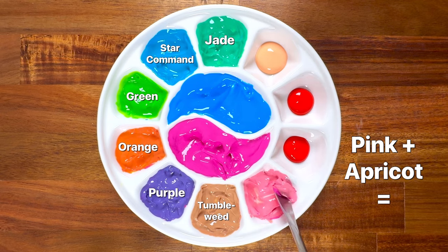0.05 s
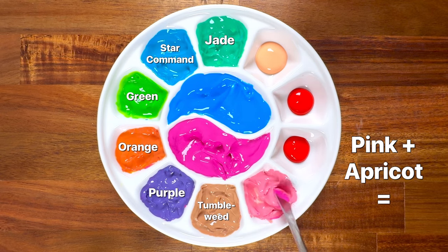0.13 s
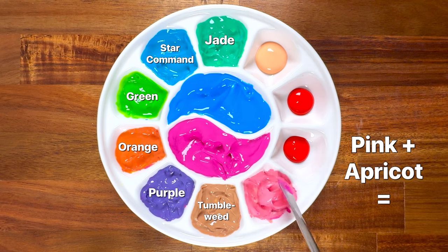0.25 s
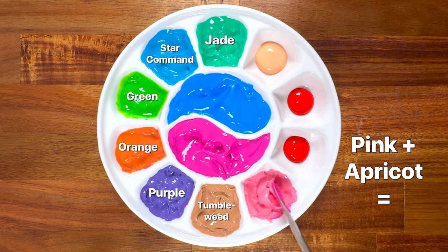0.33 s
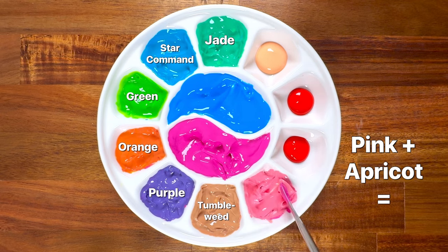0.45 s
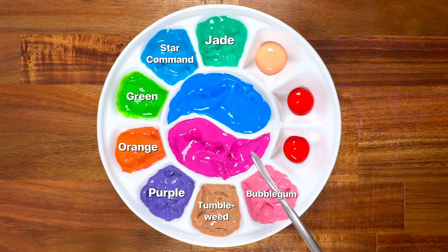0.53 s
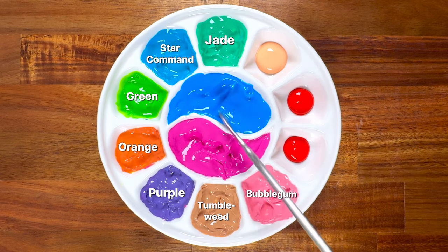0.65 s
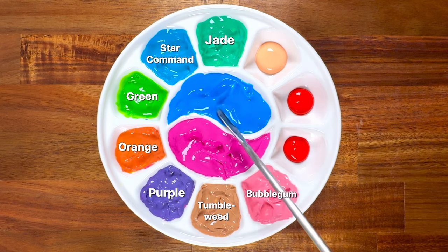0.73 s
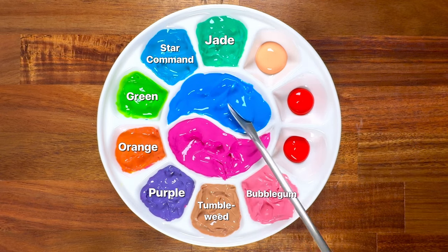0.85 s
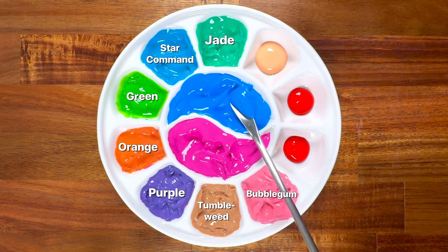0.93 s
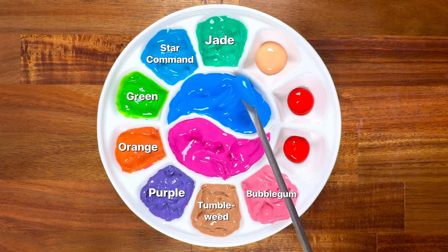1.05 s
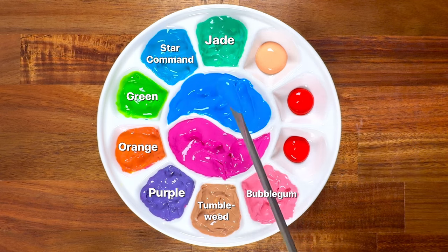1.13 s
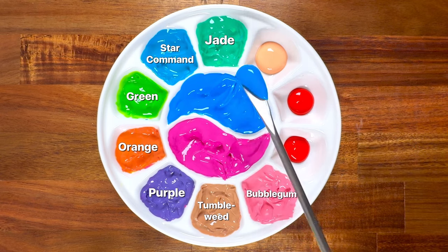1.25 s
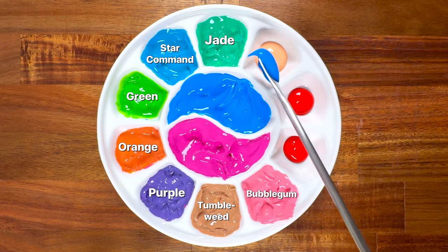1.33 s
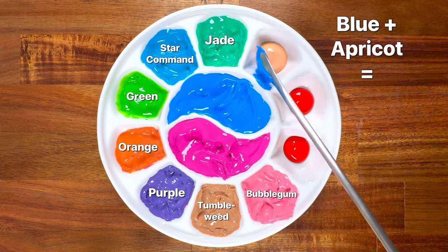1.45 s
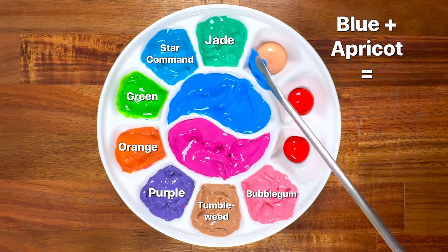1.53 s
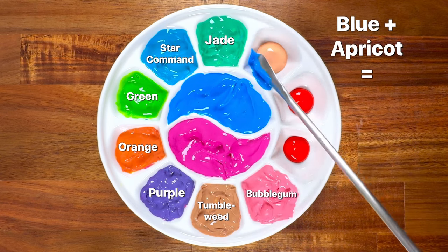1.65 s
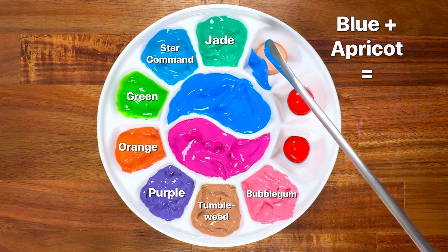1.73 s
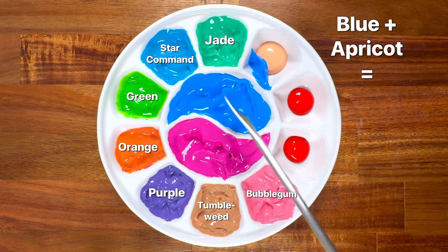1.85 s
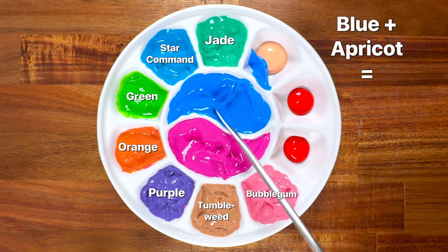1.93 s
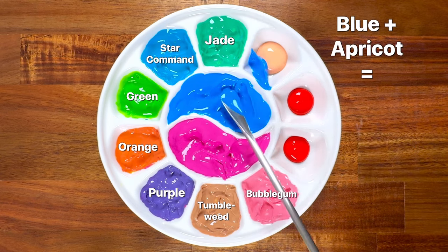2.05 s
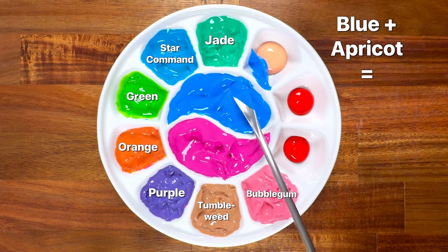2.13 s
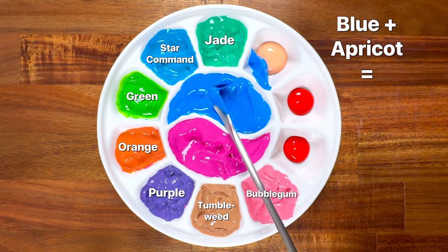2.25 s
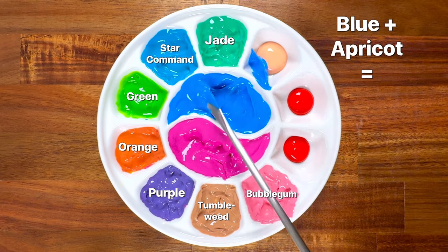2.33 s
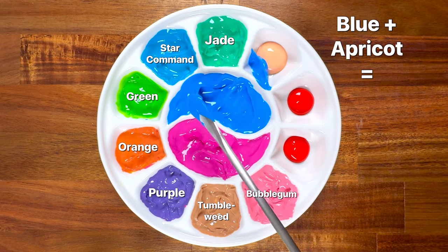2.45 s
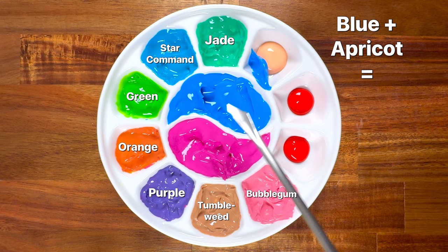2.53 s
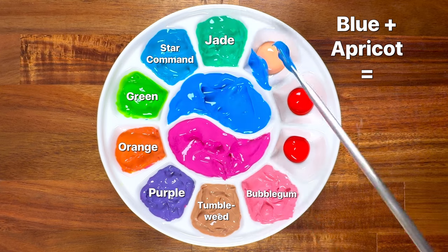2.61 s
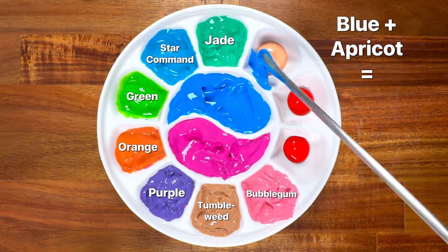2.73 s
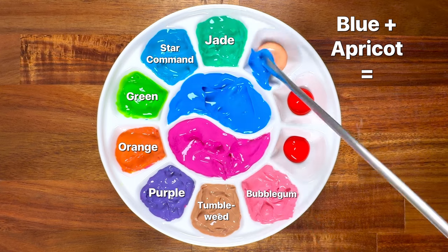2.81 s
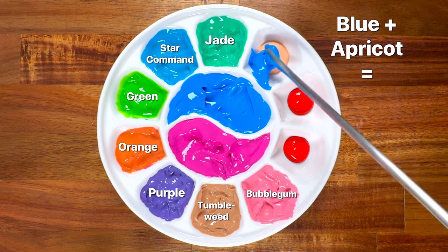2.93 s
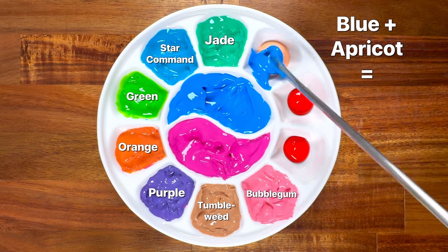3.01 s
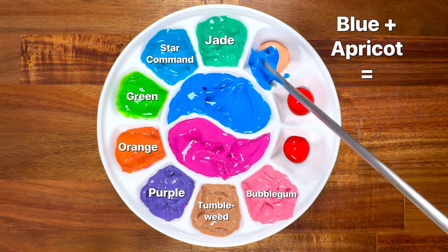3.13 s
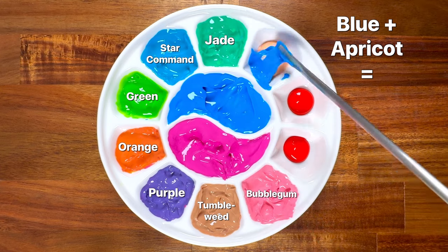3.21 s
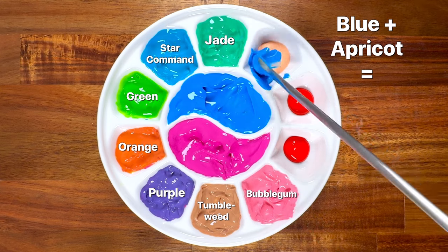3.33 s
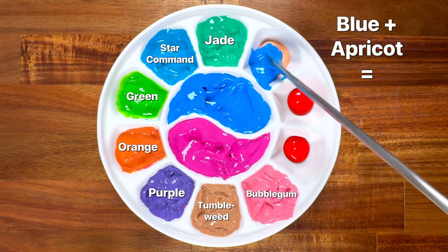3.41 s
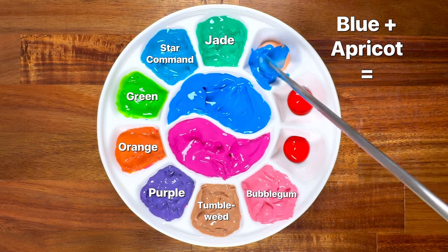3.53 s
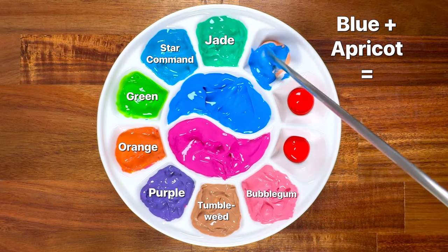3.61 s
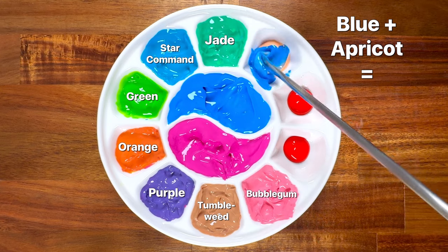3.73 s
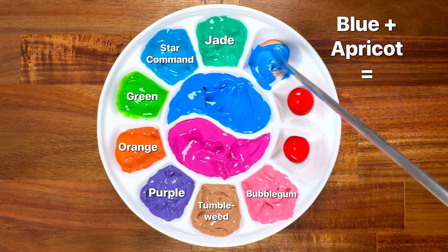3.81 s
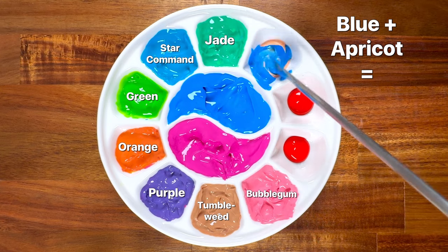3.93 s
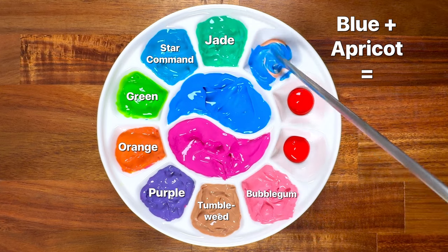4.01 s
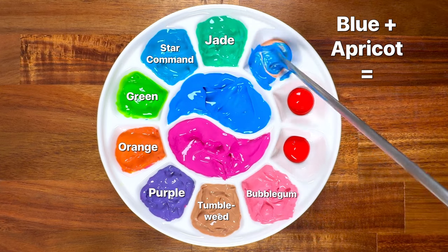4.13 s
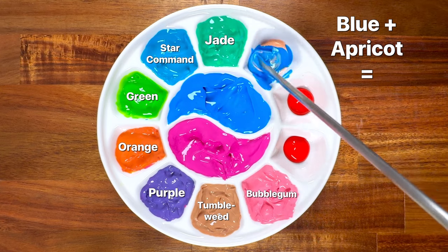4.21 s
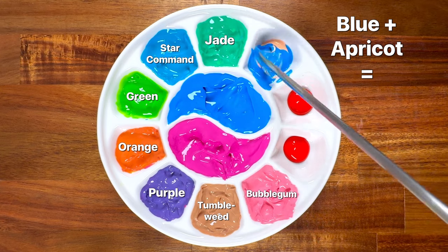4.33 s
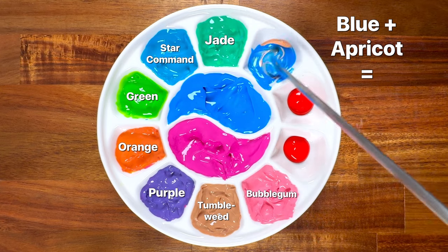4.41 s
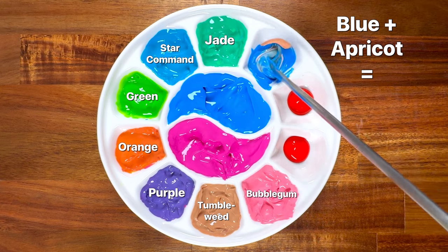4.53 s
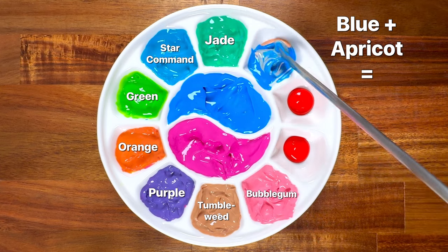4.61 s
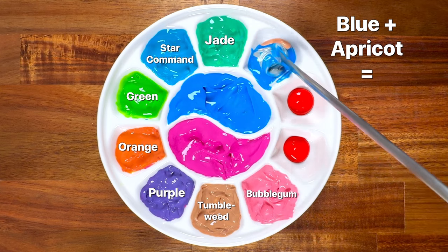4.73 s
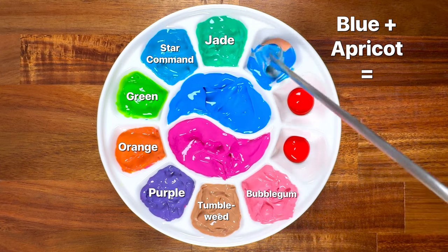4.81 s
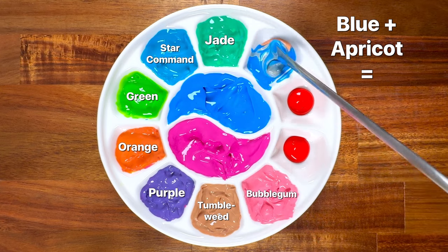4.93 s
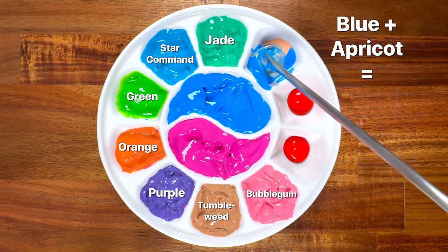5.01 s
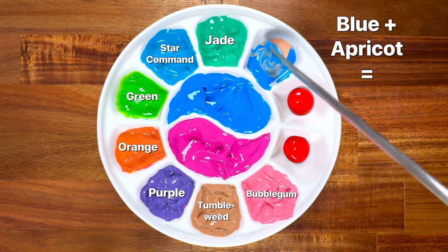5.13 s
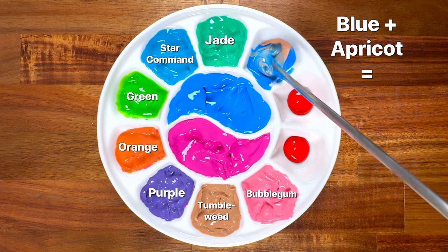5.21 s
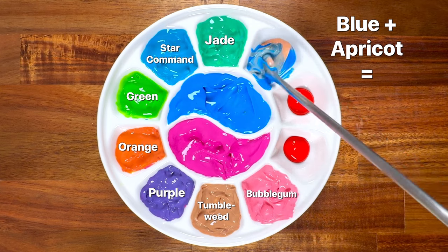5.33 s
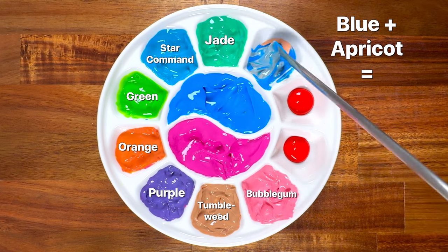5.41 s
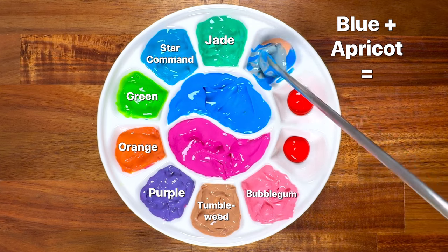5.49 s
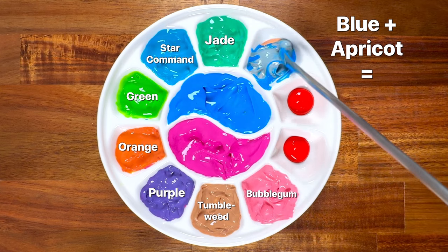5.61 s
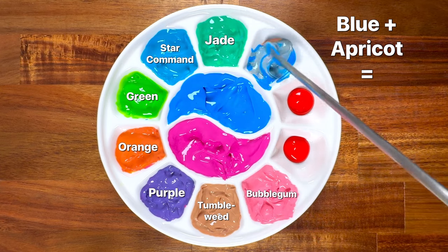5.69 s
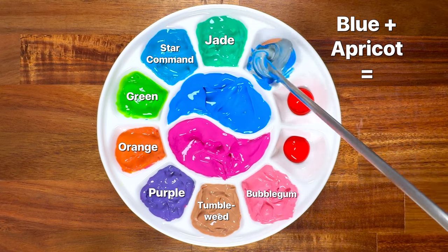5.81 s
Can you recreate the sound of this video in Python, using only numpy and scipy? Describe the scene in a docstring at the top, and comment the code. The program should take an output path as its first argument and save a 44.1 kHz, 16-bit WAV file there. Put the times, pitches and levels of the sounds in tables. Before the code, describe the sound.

A metal blade strikes plastic well walls, recorded close in stereo in a quiet room. A brief, tight cluster of sped-up clicks and a dull paint squelch give way to near silence with isolated light tinks and faint scrapes. Then strong cracking taps arrive, followed by fast irregular clattering with short bright rings and table thuds, ending in a few spaced hard knocks and a quick last flurry.

```python
"""Palette knife in thick paint

A steel knife stirs paint in the wells of a plastic palette on a wooden table, heard very close.
Taps on the well walls ring the blade, crack and rattle the plastic and thump the table (decaying modes
plus coloured noise); the blade also scrapes (grainy noise) and the paint squelches (dull noise bursts).
Time-lapse: each stretch has its own speed, which scales pitches up and decays down; room air lies below.
A fast limiter flattens the hardest taps."""
import sys
import numpy as np
from scipy import signal
from scipy.fft import rfft, irfft
from scipy.io import wavfile
from scipy.ndimage import uniform_filter1d, minimum_filter1d

SR = 44100
rng = np.random.default_rng(int(sys.argv[2]) if len(sys.argv) > 2 else 0)


def to_wav(sig):
    """Store sig (one row per channel, or 1-D mono) as 16-bit WAV at the path in sys.argv[1].

    Samples outside -1..1 are clipped; the rate is SR.
    """
    pcm = np.clip(np.atleast_2d(sig), -1, 1) * 32767
    pcm = np.round(pcm).astype(np.int16)
    wavfile.write(sys.argv[1], SR, pcm.T)  # frames by channels


N = 258426

# All mode and colour tables hold for speed 1; levels within one table are relative.
# time-lapse stretches: start t/s
STRETCH_STARTS_S = [0, .515, 3.1, 4.48, 5.68]
# time-lapse stretches: speed/factor
STRETCH_SPEEDS = [3.2, 1.385, 1.0, 1.097, 1.52]
# room air in each stretch: level/dB
ROOM_LEVELS_DB = [-52, -49.5, -50, -49.5, -50.5]
# knife taps: t/s, strength/dB, blade ping re strength/dB (high when the blade is free to ring)
TAPS = [(.0002, -17.5, -23), (0.2113, -29, -20), (.2715, -41.5, -20), (0.2886, -42, -20),
        (0.319, -32.5, -20), (.3304, -34, -20), (0.3428, -28.5, -20), (0.4043, -16, -20), (.4612, -11, -29),
        (0.5005, -24.5, -23), (0.509, -36.5, -19), (0.7022, -36, 20.5), (1.4212, -19.5, 1.5),
        (1.4355, -26, 10), (1.549, -23.5, 8), (1.9666, -14, 9), (2.2441, -32, 9.5), (2.835, -3, -25),
        (3.031, -12, -21), (3.1434, -20, -9), (3.267, -2, -4), (3.3933, -8, -14), (3.5301, -42, 6),
        (3.664, -38, 1.5), (3.6997, -22, 0), (3.746, -9.5, -30), (3.841, -22, -21), (3.9229, -13, -1),
        (3.9483, -18.5, -14), (3.967, -27.5, -3), (4.0106, -10, -5.5), (4.0591, -15, -9),
        (4.1193, -9.5, -16.5), (4.1643, -10, -5), (4.2013, -16, -13), (4.2591, -8, -5.5),
        (4.2982, -10.5, -9), (4.4044, -12, -3.5), (4.4169, -9, -12), (4.4431, -13.5, -7), (4.5099, -8, -1),
        (4.539, -15.5, -7), (4.5617, -23.5, -11), (4.5947, -14, -11), (4.6274, -11, -1),
        (4.6559, -19.5, -2), (4.7318, -8.5, -4), (4.7658, -15, -16), (4.7882, -18, -23), (4.834, -31, -17),
        (4.8524, -19, -2.5), (4.8736, -15.5, -12.5), (4.8976, -15.5, -26), (4.9535, -13, -3),
        (5.18, -3, -13), (5.3234, -27.5, -5), (5.461, -2.5, -1), (5.6177, -17.5, -3.5), (5.6319, -12, -8),
        (5.702, -16, -16), (5.7221, -24.5, -0.5), (5.8024, -13.5, -3), (5.8259, -24, -30)]
# blade dragging over plastic: t/s, nominal length/s, level/dB
SCRAPES = [(.793, 0.021, -35.5), (.837, .046, -46), (1.995, .038, -43), (2.055, 0.077, -53.5),
           (2.262, .063, -51.5), (3.79, 0.036, -42.5), (4.138, 0.024, -29), (5.642, .016, -28)]
# blade digging into paint: t/s, level/dB
SQUELCHES = [(.0965, -20), (.719, -18.5)]

# blade, first and third bending modes, which clack: f/Hz, level/dB, t60/s
CLACK_MODES = [(2338, -5.5, 0.021), (2510, -1, 0.016), (9450, -11.5, 0.022), (9570, -7.5, 0.015)]
# blade, second bending mode, which pings: f/Hz, level/dB, t60/s
PING_MODES = [(5760, -3, 0.022), (5460, -8, 0.0068)]
# struck wall, short modes: f/Hz, level/dB, t60/s
WALL_MODES = [(4590, -5.5, 0.02), (7210, -10, 0.017), (7840, -1, 0.01), (8325, -0.5, .018),
              (13296, 2, 0.013)]
# plastic palette, long modes: f/Hz, level/dB
PALETTE_MODES = [(1210, -5), (1380, -8), (2400, -6), (4590, -2), (4750, -4), (7610, -2), (7860, 0),
                 (8105, 1), (8270, 0), (8380, -2), (12970, -5)]
# palette rocking on the table, modes: f/Hz, level/dB, t60/s
TABLE_MODES = [(121.85, -1.5, 0.25), (152, -9, .08), (202.5, -2.5, 0.21), (228.2, -1.5, 0.11),
               (264, -0.5, 0.067), (290, -8, 0.077), (387, -6, 0.098), (440.5, 8, 0.055), (497, -4.5, 0.2),
               (595, -0.5, 0.076)]

# first crack of the plastic: f/Hz, density/dB per Hz
CRACK_COLOUR = [(50, -43), (300, -12.5), (900, -34.5), (1350, -4), (1900, -24.5), (2600, 0), (3700, -7.5),
                (4600, -7.5), (6400, -4.5), (8150, -0.5), (9000, -4.5), (12200, -11), (13100, -5),
                (16000, -16)]
# dense after-ring of the plastic: f/Hz, density/dB per Hz
RATTLE_COLOUR = [(50, -40.5), (300, 4), (850, -8.5), (1250, 0.5), (1900, -9), (2450, -2), (3600, -8.5),
                 (4650, -3.5), (6500, -7), (8050, 0.5), (9100, -6.5), (11800, -13), (13200, -7.5),
                 (16000, -19.5)]
# broad woody thud of the table top: f/Hz, density/dB per Hz
THUD_COLOUR = [(30, -44.5), (85, -25), (120, 3.5), (175, -7.5), (235, 3), (340, -9), (480, -4.5),
               (640, -13.5), (850, -21.5), (3000, -64.5)]
# rubbed blade: f/Hz, density/dB per Hz
RUB_COLOUR = [(100, -50), (1400, -37), (2450, -8.5), (3100, -20), (3700, -14.5), (4400, -28), (5100, 1.5),
              (5500, -10), (5850, 8), (6600, -35), (12000, -41)]
# paint: f/Hz, density/dB per Hz
PAINT_COLOUR = [(30, -66.5), (90, -17.5), (230, -7), (530, -3), (1000, -8), (1600, -12), (2400, -25.5),
                (6000, -41.5), (12000, -59)]
# room air: f/Hz, density/dB per Hz
ROOM_COLOUR = [(20, -46.5), (60, -22.5), (112, 2), (180, -7), (500, -11), (800, -25), (1400, -31.5),
               (2400, -31), (5000, -38), (9000, -38.5), (14000, -44.5)]

PALETTE_T60_S, LEAD_S = .1, .0034  # at speed 1
TOP_HZ = 16200
# dB per dB of strength in the heavier parts; the wall's crack follows strength fully
BODY_GROWTH = 0.68
# heavier parts at strength 0 dB, before the trims in strike(), after_ring() and thump()
CLACK_DB, AFTER_RING_DB, THUMP_DB = -8, -15.5, -16.5
# a tap right after another only glances off the wall; the loss decays with time constant SWING_S
GLANCE_CLACK_DB, GLANCE_THUMP_DB, SWING_S = -8, -9.5, 0.053


def blows():
    """Tap times and part levels, from strength and the time to swing since the previous tap."""
    previous_s = -np.inf
    for s, strength_db, ping_db in TAPS:
        glance = np.exp(-(s - previous_s) / SWING_S)
        body_db = BODY_GROWTH * strength_db
        clack_db = CLACK_DB + body_db + glance * GLANCE_CLACK_DB
        thump_db = THUMP_DB + body_db + glance * GLANCE_THUMP_DB
        yield s, clack_db, strength_db + ping_db, strength_db, AFTER_RING_DB + body_db, thump_db
        previous_s = s


def tap(speed, clack_db, ping_db, crack_db, ring_db, thump_db):
    """Steel meets plastic: blade and wall sound at once, palette and table build up later."""
    lead = int(LEAD_S / speed * SR)
    contact = strike(speed, clack_db, ping_db, crack_db)
    hit = contact + after_ring(speed, ring_db) + thump(speed, thump_db)
    # a quiet copy of the contact sound, starting a few ms early
    early_copy = undb(-24.5) * np.pad(contact, ((0, 0), (0, lead)))
    return np.pad(hit, ((0, 0), (lead, 0))) + early_copy


def strike(speed, clack_db, ping_db, crack_db):
    """Contact: the blade's bending modes clack and ping, the wall rings briefly and cracks."""
    t = np.arange(SR // 4) / SR
    age = t * speed
    bite = 1 - fade(age, .001)
    clack = ring(CLACK_MODES, t, speed, detune=.01, spread=0.092) * bite
    ping = ring(PING_MODES, t, speed, detune=0.003, spread=0.18) * (1 - fade(age, 0.0025))
    wall = ring(WALL_MODES, t, speed, detune=0.0078, spread=0.33) * bite
    snap = noise(CRACK_COLOUR, speed, len(t), spread=0.43) * fade(age, 0.02) * bite
    blade = burst(clack, clack_db - .5) + burst(ping, ping_db)
    return blade + burst(wall, crack_db - 2.5) + burst(snap, crack_db - 2)


def after_ring(speed, db):
    """The blow spreads through the plastic, so its ring builds up; its rattle flutters randomly in level."""
    t = np.arange(SR // 4) / SR
    age = t * speed
    spreading = 1 - fade(age, 0.048)
    flutter = uneven(len(t), db=2)
    palette = [(hz, level_db, PALETTE_T60_S) for hz, level_db in PALETTE_MODES]
    modes = ring(palette, t, speed, detune=.003, spread=0.23) * spreading
    rattle = noise(RATTLE_COLOUR, speed, len(t), spread=0.94) * fade(age, .12)
    rattle = rattle * spreading * flutter
    return burst(modes, db - 6) + burst(rattle, db - 0.5)


def thump(speed, db):
    """The heavy table gets moving gradually: rocking modes and a woody thud."""
    t = np.arange(SR // 4) / SR
    age = t * speed
    swell = 1 - fade(age, 0.026)
    rocking = ring(TABLE_MODES, t, speed, detune=.035, spread=0.065) * swell
    thud = noise(THUD_COLOUR, speed, len(t), spread=0.3) * fade(age, 0.19) * swell
    return burst(rocking, db - 1) + burst(thud, db - 2.5)


def scrape(speed, length_s, db):
    """The edge sticks and slips: hiss in uneven grains, dying away as the stroke slows."""
    size = int(1.5 * length_s * SR)
    progress = np.arange(size) / SR / length_s
    pressure = np.interp(progress, [0, .12, .85, 1.5], [0, 1, .7, 0])
    return undb(db) * pressure * uneven(size, db=5.0) * noise(RUB_COLOUR, speed, size, spread=0.28)


def squelch(speed, db):
    """Thick paint gives way with a dull, quickly fading smack."""
    t = np.arange(SR // 4) / SR
    envelope = fade(t * speed, 0.14) * (1 - fade(t * speed, 0.048))
    return burst(noise(PAINT_COLOUR, speed, len(t), spread=0.516) * envelope, db)


def room():
    """A low rush of air, steady within each stretch and transposed by its speed."""
    stretch = stretch_at(np.arange(N) / SR)
    out = 0
    for k, (speed, db) in enumerate(zip(STRETCH_SPEEDS, ROOM_LEVELS_DB)):
        gate = uniform_filter1d(1. * (stretch == k), size=200)
        out = out + undb(db) * noise(ROOM_COLOUR, speed, N, spread=1.0) * gate
    return out


def ring(modes, t, speed, detune, spread):
    """Struck modes; weights, tuning and direction vary a little at random."""
    out = 0
    sides = spread * np.array([[1], [-1]])
    for hz, db, t60_s in modes:
        weight, tune, turn, pan, lag = rng.standard_normal(5)
        hz = hz * speed * (1 + detune * tune)
        phase = np.pi * turn + sides * np.sign(lag)
        wave = np.sin(2 * np.pi * hz * t + phase) * np.exp(.5 * sides * pan)
        below_nyquist = hz < SR / 2
        out = out + below_nyquist * undb(db + 2 * weight) * wave * fade(t * speed, t60_s)
    return out


def noise(colour, speed, size, spread):
    """Stereo noise, rms 1, colour transposed by speed; spread = side/mid, narrower in the bass."""
    hz, db = np.transpose(colour)
    bins_hz = np.maximum(np.arange(size // 2 + 1) * SR / size, 1) / speed
    gain = undb(np.interp(np.log(bins_hz), np.log(hz), db))
    width = spread * np.clip(bins_hz / 800, .2, 1)
    spectra = rfft(rng.standard_normal((2, size)))
    mid, side = irfft(spectra * [gain, gain * width], size)
    x = np.array([mid + side, mid - side])
    return x / np.sqrt(np.mean(x ** 2))


def uneven(size, db):
    """Gain fluttering by db rms every few ms."""
    flutter = uniform_filter1d(rng.standard_normal(size), size=180)
    return undb(db * flutter / flutter.std())


def burst(x, db):
    """Scale a short stereo sound to the energy of 10 ms at rms level db."""
    return x * undb(db) / np.sqrt(np.sum(x ** 2) / (2 * SR / 100))


def fade(t, t60_s):
    """Exponential decay, 60 dB down after t60_s."""
    return np.exp(-np.log(1000) * t / t60_s)


def undb(db):
    """Decibels to gain."""
    return 10 ** (np.asarray(db) / 20)


def stretch_at(s):
    """Index of the stretch that holds time s."""
    return np.searchsorted(STRETCH_STARTS_S, np.maximum(s, 0), side="right") - 1


def add(out, x, s):
    """Mix x into out from time s on."""
    i = max(int(s * SR), 0)
    out[:, i:i + x.shape[1]] += x[:, :max(N - i, 0)]


def scene():
    """Taps, scrapes and squelches over the room."""
    out = room()
    layers = ((blows(), tap, LEAD_S), (SCRAPES, scrape, 0), (SQUELCHES, squelch, 0))
    for events, source, lead_s in layers:
        for s, *values in events:
            speed = STRETCH_SPEEDS[stretch_at(s)]
            add(out, source(speed, *values), s - lead_s / speed)
    return out


def record(dry):
    """Look-ahead limiter, hard ceiling at 1.1, then rumble and top are cut."""
    gain = np.minimum(1, 1.4 / (np.abs(dry).max(axis=0) + 1e-9))
    gain = uniform_filter1d(minimum_filter1d(gain, size=7), size=7)
    limited = np.clip(dry * gain, -1.1, 1.1)
    rumble_cut = signal.butter(2, 55, "highpass", fs=SR, output="sos")
    top_cut = signal.ellip(8, .2, 70, TOP_HZ, fs=SR, output="sos")
    return signal.sosfilt(top_cut, signal.sosfilt(rumble_cut, limited))


dry = scene()
out = record(dry)
to_wav(out)
```